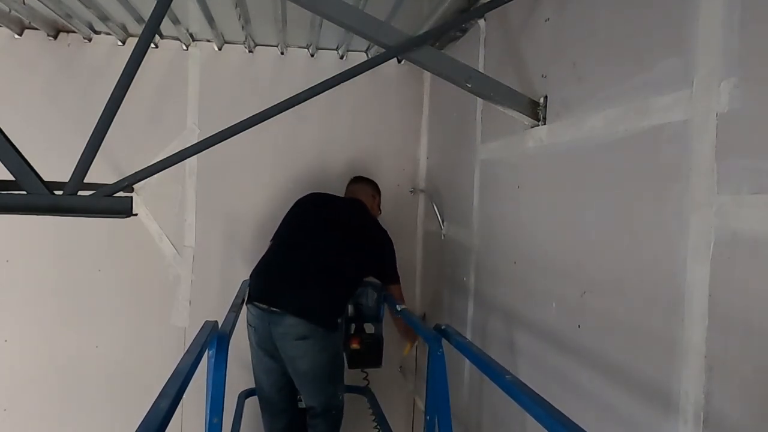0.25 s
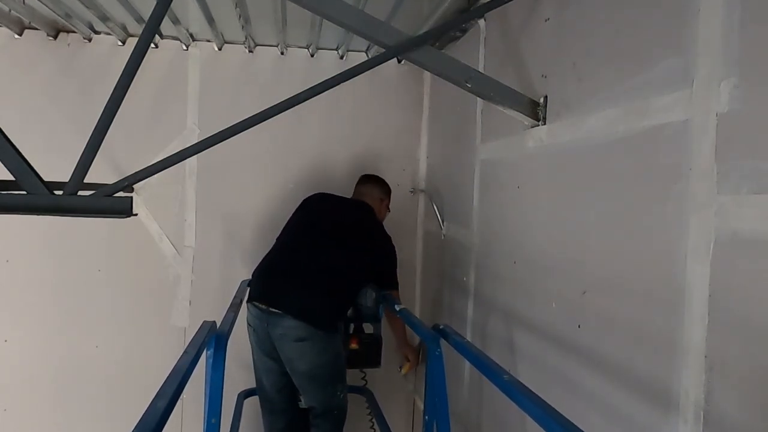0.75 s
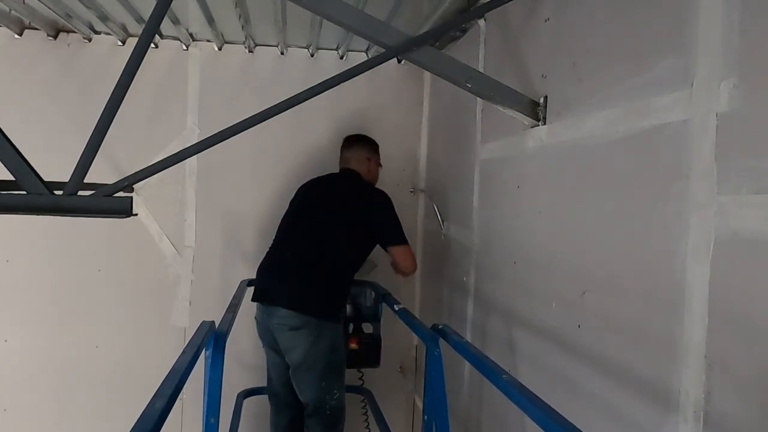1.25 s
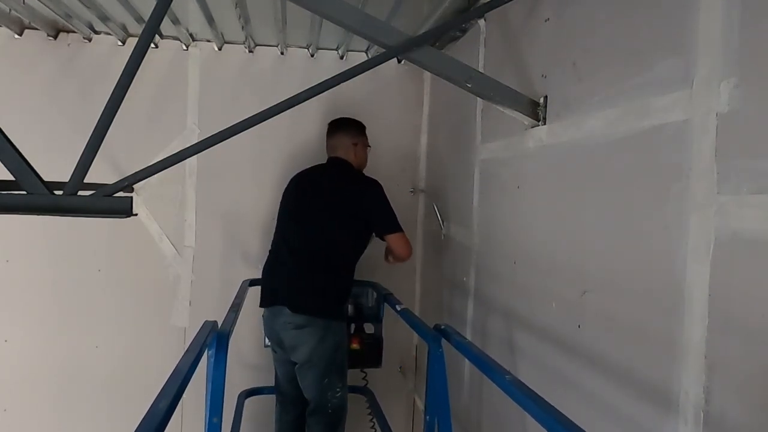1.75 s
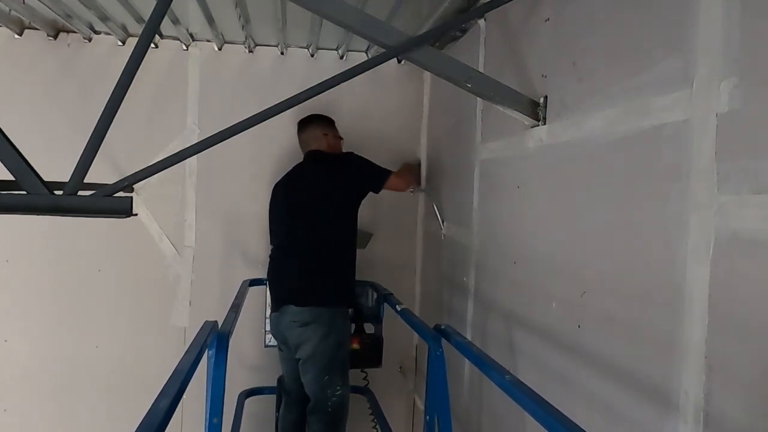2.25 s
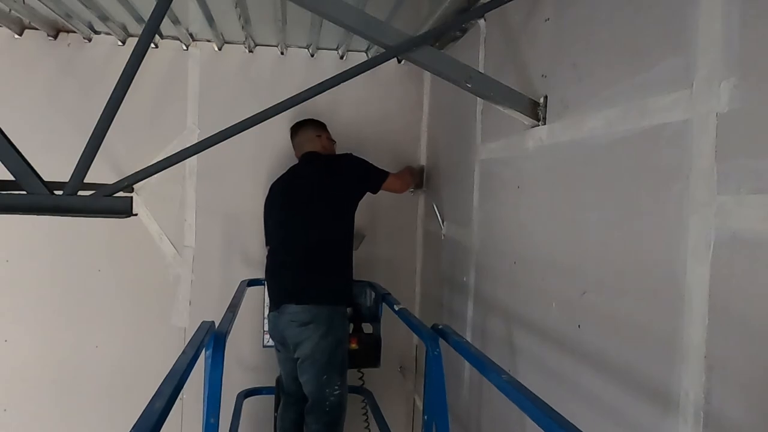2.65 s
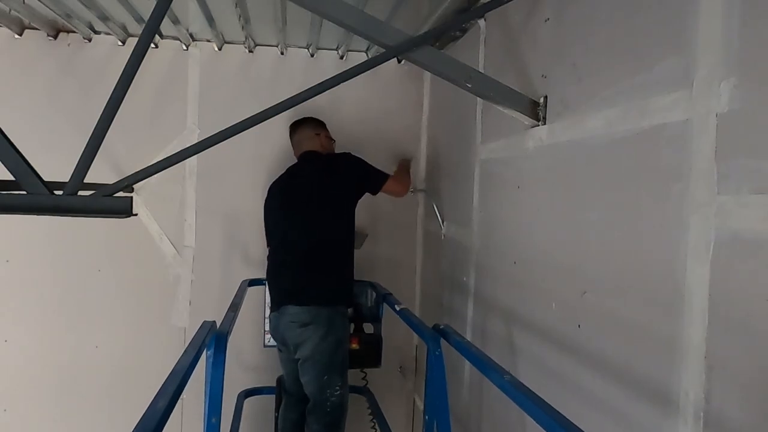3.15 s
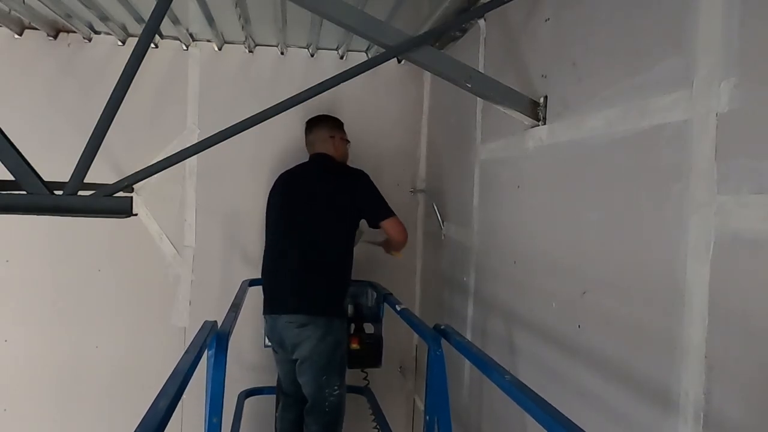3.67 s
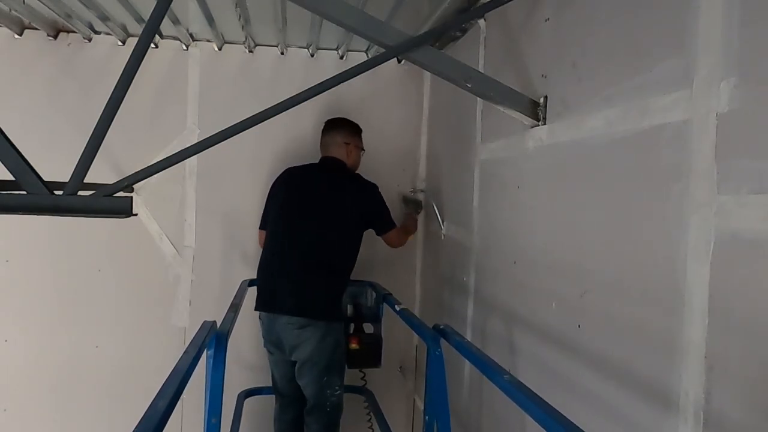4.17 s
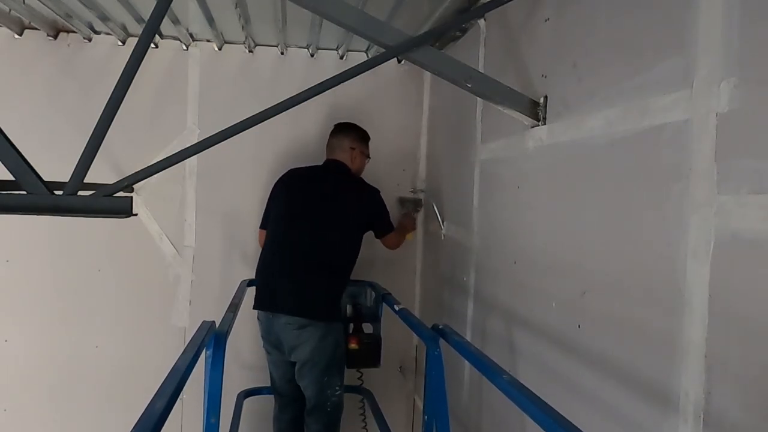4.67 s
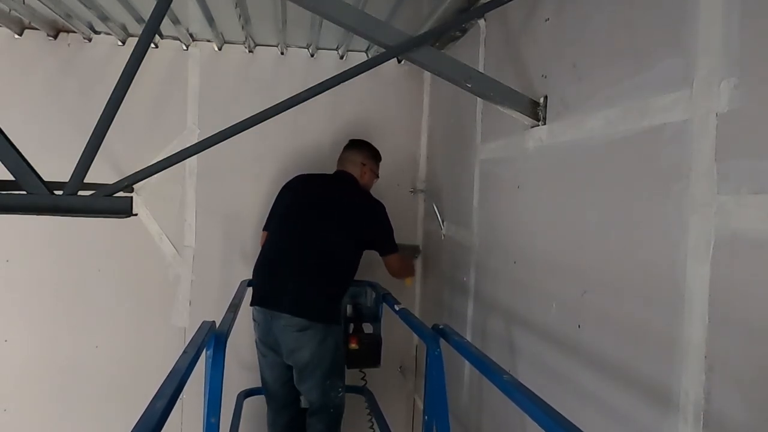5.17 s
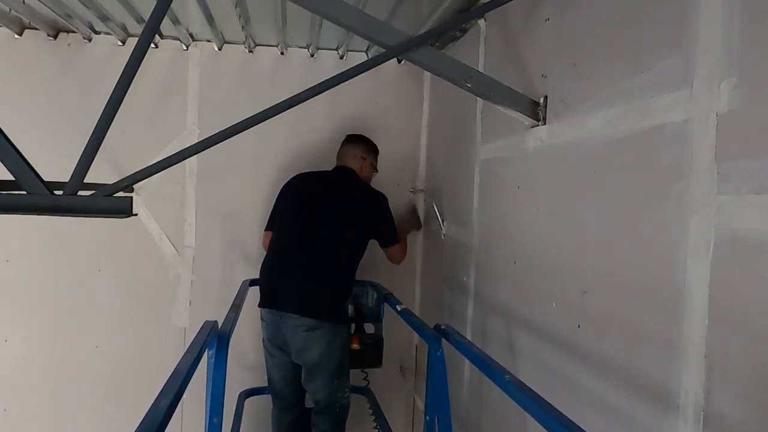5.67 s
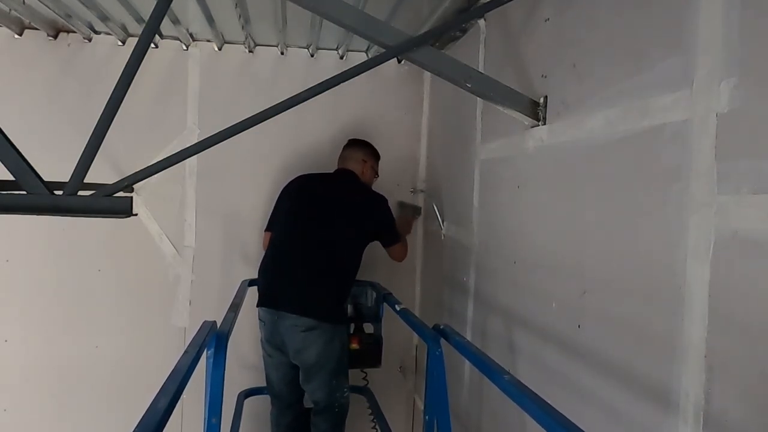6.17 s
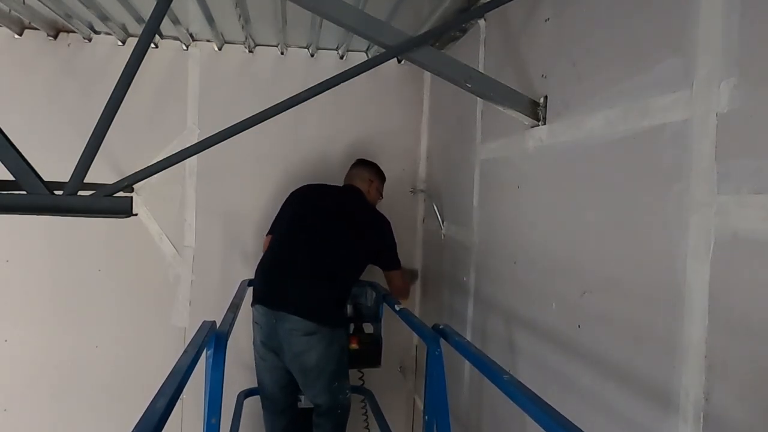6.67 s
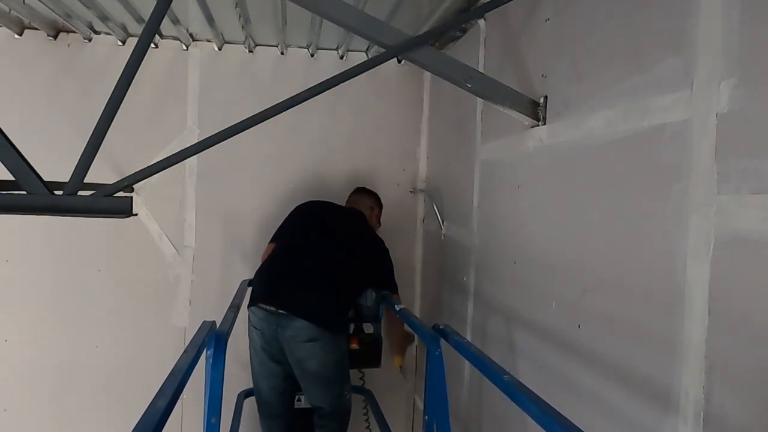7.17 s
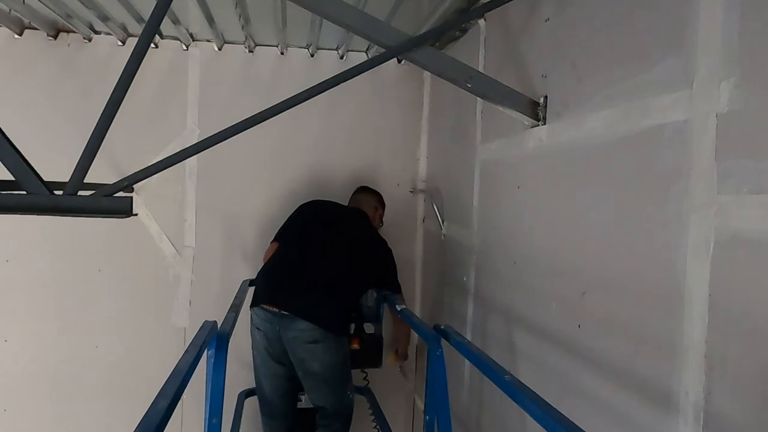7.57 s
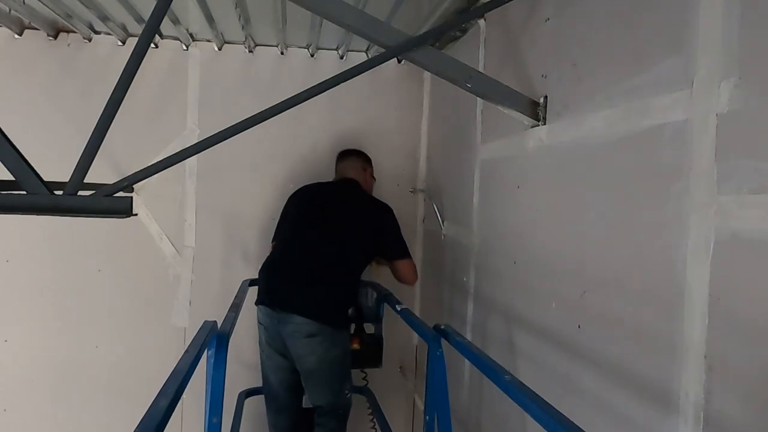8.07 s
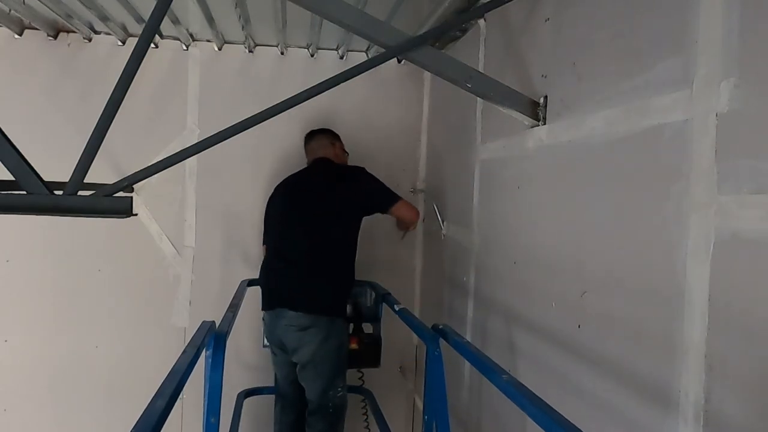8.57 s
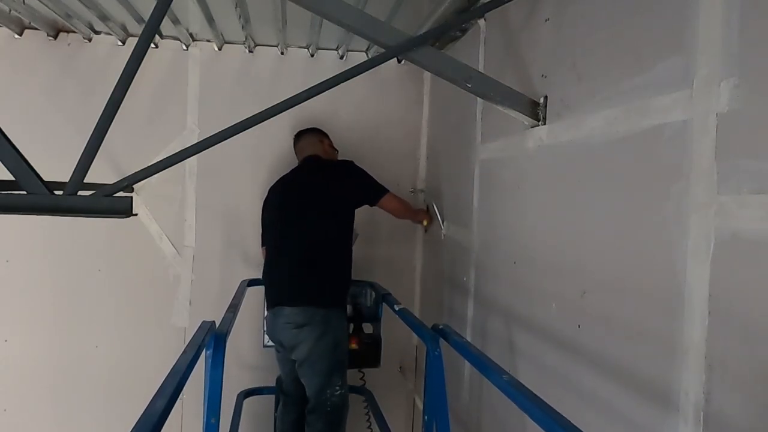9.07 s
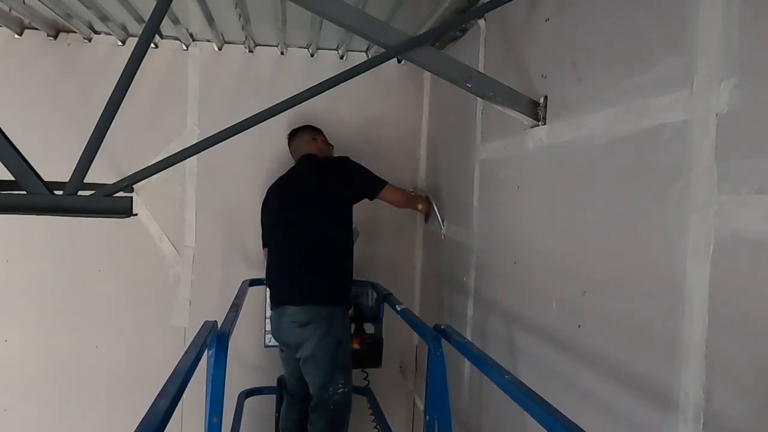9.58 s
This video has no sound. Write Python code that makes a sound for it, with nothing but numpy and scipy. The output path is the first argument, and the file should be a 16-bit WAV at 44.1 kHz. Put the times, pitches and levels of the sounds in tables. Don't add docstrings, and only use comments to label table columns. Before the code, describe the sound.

A taping knife scrapes grittily over a wall in a bare, echoing hall, clacking three times on a metal pan above faint traffic and engine hum.

```python
import sys
import numpy as np
from scipy import signal
from scipy.fft import rfft, irfft, next_fast_len
from scipy.io import wavfile
from scipy.ndimage import uniform_filter1d

SR = 44100
rng = np.random.default_rng(int(sys.argv[2]) if len(sys.argv) > 2 else 0)


def ratio(d):
    e = np.asarray(d, float) / 20
    return 10 ** e


def transcribe(signal):
    frames = np.atleast_2d(signal).T
    limited = np.clip(frames, -1, 1)
    pcm = np.round(limited * 32767).astype(np.int16)
    wavfile.write(sys.argv[1], SR, pcm)


N = 433498


def evened(x):
    return x / np.sqrt(np.mean(x ** 2) + 1e-20)


def read(points, hz):
    f, value = np.transpose(points)
    return np.interp(np.log(hz + 1), np.log(f + 1), value)


def add(mix, start_s, sound):
    part = mix[round(start_s * SR):][:len(sound)]
    part += sound[:len(part)]


def band(x, lo_hz, hi_hz):
    sos = signal.butter(2, [lo_hz, min(hi_hz, .45 * SR)], "bandpass", fs=SR, output="sos")
    return signal.sosfilt(sos, x)


def steep(x, lo_hz, hi_hz):
    return band(band(x, lo_hz, hi_hz), 0.27 * lo_hz, 20000)


def colour(x, gain):
    size = next_fast_len(x.shape[-1])
    spectrum = rfft(x, size) * gain(np.fft.rfftfreq(size, 1 / SR))
    return irfft(spectrum, size)[..., :x.shape[-1]]


def register(x, lo_hz, hi_hz):
    under = lambda hz, edge: 1 / (1 + (hz / edge) ** 6)
    return evened(colour(x, lambda hz: under(hz, hi_hz) - under(hz, lo_hz)))


def drift(size, hz):
    settle = 4000
    slow = signal.butter(2, hz, fs=SR, output="sos")
    return evened(signal.sosfilt(slow, rng.standard_normal(size + settle))[settle:])


def resonate(x, hz, width_hz):
    turn = np.exp(2j * np.pi * np.cumsum(hz * np.ones(len(x))) / SR)
    r = np.exp(-np.pi * width_hz / SR)
    return 2 * (turn * signal.lfilter([1 - r], [1, -r], x / turn + 1e-18)).real


# pitch_hz, level_db (per Hz)
TYRE_ROAR = [(240, -29), (400, -35.5), (448, -30), (488, -21), (622, -11.5), (717, -12), (1020, -0.5),
             (1110, -2), (1400, 0), (1970, -9.5), (2690, -22), (4000, -29.5), (8500, -38.5), (11000, -62),
             (15600, -97.5)]
# pitch_hz, level_db (per Hz)
LOW_RUMBLE = [(12, -49.5), (20, -26.5), (54, -6.5), (118, -7), (151, -14.5), (232, -16.5), (265, -22),
              (500, -31), (650, -58), (1100, -120)]
# time_s, level_db
NEARNESS = [(0, -50), (1.3, -55.5), (2.301, -59.5), (3.501, -58), (5.599, -56.5), (6.102, -54),
            (7.3, -55.5), (8.002, -51), (8.799, -50), (9.3, -46), (9.83, -48)]


def traffic():
    frames, hz = N // 512 + 5, np.fft.rfftfreq(2048, 1 / SR)
    real, imaginary, patches = rng.standard_normal((3, 2, 1025, frames))
    patches = uniform_filter1d(patches[0], size=14, axis=0)
    patches = evened(uniform_filter1d(patches, size=8, axis=1))
    z = (real + 1j * imaginary) * ratio(2.0 * patches)

    def part(shape):
        shaped = z * ratio(read(shape, hz))[:, None]
        return evened(signal.istft(shaped, nperseg=2048, noverlap=1536)[1][:, :N])

    near_db = np.interp(np.arange(N) / SR, *np.transpose(NEARNESS))
    rumble_db = -47 + 0.31 * (near_db - near_db.mean())
    return part(TYRE_ROAR) * ratio(near_db) + part(LOW_RUMBLE) * ratio(rumble_db)


def engine(speed, swells, orders, waver_db):
    t = np.arange(N) / SR
    firing_hz = np.interp(t, *np.transpose(speed)) * (1 + .012 * drift(N, 5.3))
    turns = np.cumsum(firing_hz) / SR
    tone = sum(ratio(db + waver_db * drift(N, 10)) * np.sin(2 * np.pi * (k * turns + rng.random()))
               for k, db in orders)
    swell = sum(ratio(db) * np.exp(-.5 * ((t - s) / width) ** 2) for s, width, db in swells)
    return np.sqrt(2) * tone * swell


# time_s, firing_hz
TRUCK_SPEED = [(0, 104), (2.2, 109), (3.3, 115), (5, 121), (8.6, 143)]
# multiple, level_db
ENGINE_ORDERS = [(1, -0.5), (1.5, -20), (2, -20)]
# centre_s, half_width_s, level_db
TRUCK_MOMENTS = [(.6, 0.37, -44), (2.199, 0.13, -43.5), (3.251, 0.44, -50.5), (4.45, 0.22, -48.5),
                 (5.27, 0.067, -41.5), (6.602, 1.7, -55)]
# time_s, firing_hz
DRONE_SPEED = [(0, 67.44), (6.7, 68.84), (7.5, 74), (8.4, 70.76), (9.83, 68.66)]
# centre_s, half_width_s, level_db
DRONE_MOMENTS = [(3.299, 0.21, -50.5), (5.1, 0.67, -47), (7.3, 0.16, -36.5), (7.6, 0.092, -45.5),
                 (8.201, 0.19, -36.5), (9.12, 0.2, -42), (9.33, 0.017, -37), (9.75, 0.3, -41)]
# time_s, firing_hz
IDLE_SPEED = [(0, 92), (.8, 94.5), (1.5, 99)]
# centre_s, half_width_s, level_db
IDLE_MOMENTS = [(.3, .15, -46), (.7, 0.21, -37), (1.3, .2, -49)]


def far_engines():
    truck = engine(TRUCK_SPEED, TRUCK_MOMENTS, ENGINE_ORDERS, waver_db=1.5)
    drone = engine(DRONE_SPEED, DRONE_MOMENTS, [(0.98, 0.0092)], waver_db=3.5)
    idle = engine(IDLE_SPEED, IDLE_MOMENTS, ENGINE_ORDERS, waver_db=-1.0)
    return truck + drone + idle


# pitch_hz, level_db (per Hz)
GRIT = [(120, -42.5), (200, -5), (378, -32.5), (535, -8.5), (586, -14), (715, -15), (957, -4),
        (1070, -10.5), (1480, -6), (2800, -12.5), (3960, -12), (8510, -24.5), (13000, -39.5), (15600, -52)]


def stroke(motion, modes, drum_start_db, drum_end_db):
    s, *columns = np.transpose(motion)
    t = np.arange(s[0], s[-1], 1 / SR)
    size = len(t)
    pressure_db, slide_db = (np.interp(t, s, c) for c in columns)
    drum_db = np.linspace(drum_start_db, drum_end_db, size)
    fizz_db = -11.5 + 1.35 * slide_db

    slips = rng.standard_normal(size) * ratio(0.41 * drift(size, 71) + 1.0 * drift(size, 460))
    hiss = rng.standard_normal(size) * ratio(0.45 * drift(size, 90))
    bed = colour(hiss, lambda hz: ratio(read(GRIT, hz)))
    flex = 1 + .012 * drift(size, 4)

    rings = np.zeros(size)
    for k, (hz, width_hz, db) in enumerate(modes):
        damped_hz = width_hz + .015 * hz
        level = ratio(db) * ratio(2.6 * drift(size, 9)) / np.sqrt(1 + (hz / 4000) ** 2)
        rings += (-1) ** k * level * evened(resonate(slips, hz * flex, damped_hz))
    body = evened(bed) + ratio(3.0) * evened(steep(rings, 380, 7500))

    sound = ratio(drum_db) * register(body, 330, 900)
    sound += register(body, 900, 2400)
    sound += ratio(slide_db) * register(body, 2400, 6200)
    sound += ratio(fizz_db) * register(body, 6200, 19000)
    ends = signal.windows.tukey(size, min(1, .025 * SR / size))
    return s[0], ratio(pressure_db - 2.5) * sound * ends


# time_s, pressure_db, slide_db (a faster slide is grittier)
SET_DOWN_MOTION = [(0.0, -40, 3), (0.056, -39.5, 1), (0.062, -31.5, -7), (0.072, -41.5, 1.5),
                   (0.222, -41.5, 0), (0.23, -45, -1)]
WIPE_DOWN_MOTION = [(0.205, -41.5, 1), (0.283, -38, 1), (0.385, -42.5, -4.5), (0.419, -56, 5.5),
                    (0.46, -50, -7.5)]
WIPE_OFF_MOTION = [(0.44, -49, 3), (0.474, -47, 3), (0.612, -51.5, 5), (0.646, -55, 3), (0.72, -52, 8)]
FLICK_MOTION = [(.708, -48.5, 1), (.725, -38, 0), (.745, -35, 0.11), (.768, -40, -0.85), (.785, -52, -1)]
TRAIL_MOTION = [(0.79, -52.5, 3), (0.858, -47, 6), (0.914, -48.5, 3), (0.946, -47, 0.5), (1.04, -60.5, 1),
                (1.05, -54, -13)]
SMOOTH_MOTION = [(2.85, -74.5, 6.5), (2.938, -55.5, 2.5), (2.962, -54.5, -1), (3.052, -45, -1),
                 (3.068, -56.5, 4), (3.128, -47, -0.5), (3.198, -62, 9.5), (3.218, -53.5, 3),
                 (3.27, -62.5, -8)]
PRESS_IN_MOTION = [(4.6, -80, -2), (4.74, -64, 1), (4.8, -43.5, -3), (4.83, -43.5, -3.5), (4.85, -35.5, -8),
                   (4.89, -34.5, -8), (4.915, -26, -11), (4.955, -39, -5)]
PRESS_HOLD_MOTION = [(4.93, -39.5, -10), (4.958, -33, -7.5), (5.025, -35.5, -8.5), (5.04, -39, -6),
                     (5.07, -44, -2), (5.085, -31, -12), (5.115, -35, -2)]
PRESS_ON_MOTION = [(5.105, -33, -7.5), (5.17, -38, -5), (5.24, -42, -1), (5.36, -78, 12)]
BITE_MOTION = [(6.22, -49, -4), (6.266, -43.5, -3), (6.29, -34, -7), (6.36, -29, -7), (6.416, -37.5, -0.5),
               (6.424, -25, -12), (6.43, -27, -11)]
LONG_DRAG_MOTION = [(6.44, -41.5, 0), (6.6, -36.5, -4.5), (6.85, -31, -6.5), (6.94, -35.5, -5),
                    (7.03, -36.5, -4), (7.19, -33.5, -4.5), (7.25, -37.5, -1.5), (7.48, -49.5, 0),
                    (7.53, -85, -11)]
SKIM_MOTION = [(9.09, -64, 4), (9.115, -57, 4), (9.17, -55.5, 5.6), (9.205, -45.5, 4), (9.23, -54, 4),
               (9.3, -62, 2.8), (9.34, -68, 3)]
# pitch_hz, width_hz, level_db
SETTING_MODES = [(710, 36, -9), (990, 40, -8), (1270, 36, 0), (2050, 60, -10.5), (2370, 40, -7.5),
                 (3300, 80, -7), (3680, 73, -7), (4020, 130, -4.5)]
FLAT_MODES = [(1095, 30, 1), (1270, 120, -3.5), (1550, 42, -0.5), (2000, 60, -14), (3100, 63, -1.5),
              (3550, 65, -2.5), (4220, 180, -0.5)]
LIFTING_MODES = [(1030, 14, -11.5), (2010, 15, -25), (3290, 440, -9), (3930, 110, -8), (4150, 51, -24.5),
                 (5130, 150, -20)]
FLICK_MODES = [(517, 54, -1), (1010, 70, 0), (1550, 200, -0.5), (2070, 230, -6.5), (2990, 330, -7),
               (3800, 360, 1.5)]
TRAILING_MODES = [(1004, 20, 1.5), (1510, 150, -11.5), (2013, 40, -6.5), (3250, 120, -6), (3800, 250, -5.5)]
LIGHT_MODES = [(1160, 110, 3), (1770, 97, -5.5), (2634, 27, -33.5), (3560, 150, 1), (4460, 89, -10.5)]
PRESSING_MODES = [(785, 66, -7), (1510, 100, 7), (1250, 67, -5.5), (1700, 76, -8), (1850, 12, -2.5),
                  (2100, 55, -30), (2570, 14, -15), (3330, 200, -5.5), (3760, 17, -24.5)]
BITING_MODES = [(800, 33, 3.5), (1442, 21, 1.5), (1947, 26, 1.5), (2330, 45, -32), (3360, 74, 2),
                (3670, 950, 4.5)]
DRAGGING_MODES = [(678, 156, 5), (1099, 21, 5), (1395, 92, 5), (3380, 180, 0), (3950, 74, -0.5),
                  (4790, 41, -7)]
SKIMMING_MODES = [(1190, 150, 4), (2000, 220, 2.5), (3450, 300, 1.5), (4220, 220, -2.5), (5070, 150, -9),
                  (7100, 600, -12)]


def long_wipes(knife):
    # motion, modes, drum_start_db, drum_end_db
    strokes = [
        (SET_DOWN_MOTION, SETTING_MODES, -10, -14),
        (WIPE_DOWN_MOTION, FLAT_MODES, -16, -26),
        (WIPE_OFF_MOTION, LIFTING_MODES, -18, -18),
        (FLICK_MOTION, FLICK_MODES, -9, -9),
        (TRAIL_MOTION, TRAILING_MODES, -16, -12),
        (SMOOTH_MOTION, LIGHT_MODES, -12, -12),
        (PRESS_IN_MOTION, PRESSING_MODES, -12, -11),
        (PRESS_HOLD_MOTION, PRESSING_MODES, -10, -14),
        (PRESS_ON_MOTION, PRESSING_MODES, -5, -9),
        (BITE_MOTION, BITING_MODES, -6, -5),
        (LONG_DRAG_MOTION, DRAGGING_MODES, -11, -3),
        (SKIM_MOTION, SKIMMING_MODES, -13, -13)]
    for one in strokes:
        add(knife, *stroke(*one))


# pitch_hz, level_db, t60_s
CAVITY = [(160, -7.5, 0.038), (197, -3, 0.055), (273, -4.5, 0.043), (334, -8.5, 0.043)]


def blow(row, modes, thud_hz, rise_ms, chatter_ms, main_t60, main_db, touch):
    start_s, db, main_hz, thud_db, bright_db = row
    t = np.arange(SR // 3) / SR
    decay = np.exp(-np.maximum(t * 1000 - rise_ms, 0) / chatter_ms)
    contact = np.minimum(t * 1000 / rise_ms, 1) ** 2 * decay
    sharp = rng.standard_normal(len(t)) * contact
    sharp[round(rise_ms * SR / 2000)] += touch
    rattle = band(band(sharp, 54, 4600), 54, 4600)

    def top(x):
        return x / abs(x).max()

    def ring(table):
        return sum(ratio(d) * top(resonate(rattle, f, 2.8 / t60)) for f, d, t60 in table)

    body = top(ring([(main_hz, main_db, main_t60)] + modes))
    body = body + ratio(-8.5) * top(band(rattle, 500, 1900))
    thud = band(ring([(thud_hz, 1.5, .08)] + CAVITY), 79, 400)
    crack = colour(band(sharp, 1900, 9700), lambda f: ratio(read(GRIT, f)))
    sound = band(body, 370, 6400) + ratio(thud_db) * top(thud) + ratio(bright_db) * top(crack)
    return start_s - rise_ms / 2000, ratio(db) * sound


# pitch_hz, level_db, t60_s
BOARD_MODES = [(824, -14.5, 0.027), (1020, -7.5, 0.03), (1363, 0.5, 0.034), (1600, -3.5, 0.017),
               (1860, -13, 0.04)]
# start_s, peak_db, main_hz, thud_db, bright_db
SMALL_KNOCKS = [(3.025, -44, 335, 8, -33.5), (5.326, -51, 350, -23, -36), (0.947, -34.5, 480, -20, -11),
                (4.879, -26.5, 360, -18, -34), (9.174, -46.5, 1900, -28, -1), (9.204, -40, 1300, -30, -1),
                (9.66, -31, 2000, -30, -6), (.463, -44, 1500, -30, -1), (.145, -38.5, 1300, -27, -2),
                (3.039, -45, 1110, -34, -4), (2.916, -44, 1300, -30, -8), (3.1, -44.5, 1250, -28.5, -8),
                (1.068, -40, 1210, -6, -5.5), (2.598, -44, 1270, -5, -9), (2.749, -58, 1390, 10, 5),
                (3.424, -47, 1424, -23, -26), (4.951, -22.5, 1390, -16.5, -23.5),
                (5.092, -19.5, 800, -4, -13.5), (6.159, -21, 1790, -14, -9.5), (6.177, -28, 1850, -11, -6),
                (6.186, -31, 377, 8, -19), (6.203, -43.5, 1270, 10, -8), (6.4227, -18, 1316, -41, -8.5),
                (7.598, -33, 1250, -29, -3), (7.619, -23, 1244, -34, -9.5), (7.712, -45.5, 930, 8.5, -8),
                (8.987, -40.5, 1000, -5, -13), (9.115, -36, 1510, -38, -10)]
# start_s, peak_db, main_hz, thud_db, bright_db
GRAZES = [
    (1.587, -21, 1850, -14, -3),
    (1.5915, -18, 2100, -14, -5),
    (3.582, -27, 1870, -14, -10),
]


def knocks(knife):
    for row in SMALL_KNOCKS + GRAZES:
        add(knife, *blow(row, BOARD_MODES, thud_hz=194, rise_ms=1.2, chatter_ms=11.4,
                         main_t60=0.031, main_db=4.5, touch=6.5))


# start_s, level_db
WEIGHT_SHIFTS = [
    (.5, -49.5),
    (2.05, -60),
    (6.166, -47),
    (6.4, -52),
    (9.6, -46.5),
]


def platform_sways(mix):
    t = np.arange(SR // 3) / SR
    for start_s, db in WEIGHT_SHIFTS:
        push = rng.standard_normal(len(t)) * t * np.exp(-t / 0.034)
        add(mix, start_s, ratio(db) * evened(band(push, 23, 96)))


def dab(start_s, rise_s, fall_s, db, slide_db):
    loose_db = slide_db + 4
    peak_s = start_s + rise_s
    return [(start_s, db - 14, loose_db), (peak_s, db, slide_db), (peak_s + fall_s, db - 23.5, loose_db)]


# start_s, rise_s, fall_s, pressure_db, slide_db # two light touches
FIRST_LIGHT_TOUCHES = [
    (1.395, .012, .03, -72, 2),
    (4.27, .02, .04, -77, 2),
]
LIGHT_TOUCHES = [
    (4.612, 0.027, 0.072, -74, 8),
    (2.1, 0.017, 0.5, -63, 5),
    (1.9, 0.051, 0.1, -68.5, 7),
    (6.4, .05, 0.073, -50, -5),
]
LIFTING_TOUCHES = [
    (7.581, 0.045, 0.1, -41, -5),
    (7.66, 0.052, 0.064, -44.5, -4.5),
    (9.758, 0.072, .02, -48, -29),
]
FLICK_TOUCHES = [
    (9.632, 0.033, 0.047, -35.5, -1.8),
]
TIP_TOUCHES = [
    (5.76, .012, .07, -78, 7.5),
    (6.08, 0.044, 0.037, -79, 6.5),
    (6.133, 0.0087, .02, -70, 6),
    (9.494, .006, 0.03, -58.5, 7.1),
    (9.541, 0.013, 0.13, -61, 7.5),
]
# pitch_hz, width_hz, level_db
TAPPING_MODES = [(1000, 100, -3), (1500, 150, 0.5), (2000, 200, 4.5), (3500, 300, -1), (5000, 400, -7),
                 (6540, 350, -9.5)]
# pitch_hz, width_hz, level_db
TIP_MODES = [(1300, 180, 0), (4100, 150, -2), (4600, 100, -2.2), (5270, 150, -2)]


def dabs(knife):
    # touches, modes, drum_start_db, drum_end_db
    groups = [(FIRST_LIGHT_TOUCHES, LIGHT_MODES, -13, -13), (LIGHT_TOUCHES, LIGHT_MODES, -13, -13),
              (LIFTING_TOUCHES, LIFTING_MODES, -18, -16), (FLICK_TOUCHES, TAPPING_MODES, -12, -12),
              (TIP_TOUCHES, TIP_MODES, -15, -15)]
    for touches, modes, drum_start_db, drum_end_db in groups:
        for row in touches:
            add(knife, *stroke(dab(*row), modes, drum_start_db, drum_end_db))


# start_s, peak_db, main_hz, thud_db, bright_db
PAN_CLACKS = [
    (1.598, -8.5, 1905, -21, -5.5),
    (3.592, -8, 1740, -15.5, -2.5),
    (8.333, -9, 1637, -17, -3),
]
# pitch_hz, level_db, t60_s
PAN_MODES = [(2340, -29, 0.032), (3360, -3.5, 0.071), (4700, -28, .06)]
# pitch_hz, level_db, t60_s
GRIP_MODES = [
    [(575, -7, 0.049), (776, -1.5, 0.037), (1155, 2.5, 0.08), (1450, -5.5, 0.072), (1620, -2.5, 0.064),
     (1927, -0.5, 0.1), (2130, -12.5, .07)],
    [(533, -3.5, 0.044), (770, -7, 0.075), (1000, -15, .06), (1327, -3, 0.099), (1632, -4, .05),
     (1860, 2.5, 0.02), (1970, -9.5, 0.04)],
    [(561, -11.5, 0.097), (744, -13, 0.058), (990, -7.5, 0.049), (1323, 0, 0.063), (1490, -1, 0.032),
     (1712, 3.5, 0.043), (1740, -5, 0.039)],
]
BELLY_HZ = [283, 310, 197]


def pan_clacks(knife):
    for row, grip, thud_hz in zip(PAN_CLACKS, GRIP_MODES, BELLY_HZ):
        add(knife, *blow(row, PAN_MODES + grip, thud_hz=thud_hz, rise_ms=5.5, chatter_ms=16.4,
                         main_t60=0.016, main_db=-1.5, touch=3.9))


# start_s, length_s, pressure_db, top_slide_db
RIM_PULLS = [
    (1.612, 0.12, -32, 10),
    (3.615, 0.099, -30.5, 10.5),
    (8.357, 0.11, -33.5, 11.5),
]
# pitch_hz, width_hz, level_db
RIM_MODES = [(718, 38, 4), (1240, 140, 11.5), (1740, 26, 2.5), (3200, 40, 1), (3630, 140, -34.5)]


def rim_scrapes(knife):
    for start_s, length_s, db, slide_db in RIM_PULLS:
        motion = [(start_s, db, slide_db - 16),
                  (start_s + 0.71 * length_s, db - 5, slide_db),
                  (start_s + length_s, db - 7.5, slide_db - 8)]
        add(knife, *stroke(motion, RIM_MODES, -5, -2))


# pitch_hz, width_hz, level_db
RETURN_MODES = [
    [(553, 44, -3), (748, 30, -2), (970, 50, -0.5), (1165, 53, -3.5)],
    [(547, 27, 1), (720, 39, -2), (930, 32, -1), (1330, 40, -5)],
    [(532, 26, 2), (695, 47, -0.5), (950, 60, -7.5), (1286, 72, -8)],
]
RETURN_LEVELS = [-39.5, -36.5, -39]


def far_wall(slap):
    delay_s, rise_s, t60_s = 0.17, 0.032, 0.75
    t = np.arange(SR * 3 // 4) / SR
    late = t - delay_s
    shape = np.exp(-.5 * (np.minimum(late, 0) / rise_s) ** 2) * ratio(-60 * np.maximum(late, 0) / t60_s)

    def hum(modes):
        tones = sum(ratio(d) * evened(resonate(rng.standard_normal(len(t)), f, w)) for f, w, d in modes)
        return steep(tones, 400, 1800)

    for row, db, modes in zip(PAN_CLACKS, RETURN_LEVELS, RETURN_MODES):
        echo = ratio(db) * shape * np.array([hum(modes), hum(modes)])
        add(slap.T, row[0], echo.T)


# start_s, level_db, pitch_hz, t60_s
BAY_BOOMS = [
    (5.092, -35, 220, 0.44),
    (2.63, -39.5, 190, .2),
    (6.7, -40, 300, .15),
]


def bay_thumps(knife):
    t = np.arange(SR // 2) / SR
    for start_s, db, hz, t60_s in BAY_BOOMS:
        swell = ratio(db - 60 * t / t60_s) * (1 - np.exp(-t / .008))
        add(knife, start_s, swell * np.sin(2 * np.pi * hz * t) * ratio(1.5 * drift(len(t), 25)))


# pitch_hz, t60_s
HALL_DECAY = [(150, .8), (500, 1.3), (1000, 1.2), (2000, 1.05), (4000, .95), (7000, .8), (10000, .5),
              (14000, .27)]


def hall(x):
    taps = np.zeros((2, SR * 3 // 2))
    at = np.arange(500, taps.shape[1] - 20, 20)
    at = at + rng.integers(0, 20, (2, len(at)))
    np.put_along_axis(taps, at, rng.choice([-1., 1.], at.shape), 1)
    hz, t, z = signal.stft(taps, SR, nperseg=256)
    decay = ratio(-60 * t / read(HALL_DECAY, hz)[:, None])
    tail = signal.istft(z * decay, SR, nperseg=256)[1]
    return signal.fftconvolve(x[None], tail / np.linalg.norm(tail[0]), axes=1)[:, :N]


def scattered(x):
    z = signal.stft(x, nperseg=256, noverlap=192)[2]
    shuffled = z * np.exp(2j * np.pi * rng.random(z.shape))
    return np.sqrt(2) * signal.istft(shuffled, nperseg=256, noverlap=192)[1][:N]


# pitch_hz, likeness (0 to 1)
LIKENESS = [(60, .9), (150, .92), (300, .97), (1000, .97), (1600, .94), (2600, .78), (4500, .8),
            (8000, .35), (15000, .4)]
# pitch_hz, level_db
LEFT_TILT = [(60, -0.5), (180, 0.9), (550, 1.3), (1650, 4), (4970, 2), (15000, -2.5)]
# pitch_hz, phase_rad
LEFT_LEAD = [(20, 0), (250, .1), (500, 0.18), (1030, 0.5), (2240, -.8), (3400, -1.4), (6100, -0.6),
             (7600, -2), (11000, -3.5), (15000, 2)]


def ports(shared, right_only):
    def same(hz):
        return np.clip(read(LIKENESS, hz), 0, 1)

    def skew(hz):
        return ratio(read(LEFT_TILT, hz) / 2) * np.exp(.5j * read(LEFT_LEAD, hz))

    right = colour(shared, same) + colour(right_only, lambda hz: np.sqrt(1 - same(hz) ** 2))
    return np.array([colour(shared, skew), colour(right, lambda hz: 1 / skew(hz))])


def scene():
    outside, low = traffic(), far_engines()
    knife, slap = np.zeros(N), np.zeros((2, N))
    long_wipes(knife)
    knocks(knife)
    platform_sways(low)
    dabs(knife)
    pan_clacks(knife)
    rim_scrapes(knife)
    far_wall(slap)
    bay_thumps(knife)
    around = ratio(-9.5) * hall(knife) + slap + outside
    return ports(around[0] + knife + low, around[1] + ratio(4.5) * scattered(knife))


def low_pass(x):
    return signal.sosfilt(signal.butter(12, 15670, fs=SR, output="sos"), x)


def record(dry):
    dulled = signal.sosfilt(signal.butter(4, 15500, fs=SR, output="sos"), dry)
    return low_pass(dulled)


dry = scene()
out = record(dry)
transcribe(out)
```